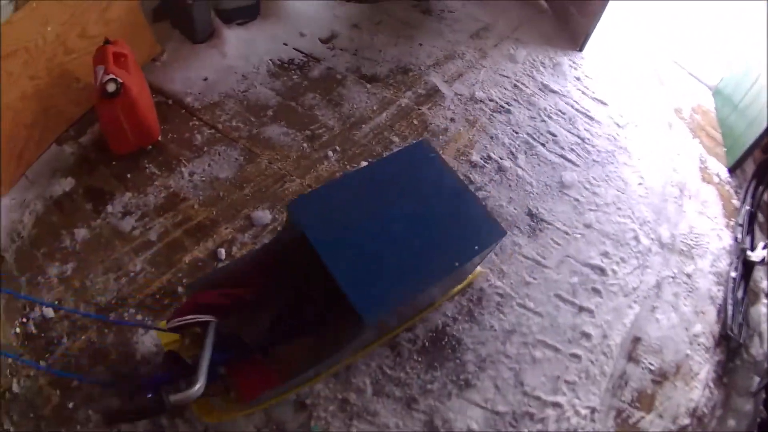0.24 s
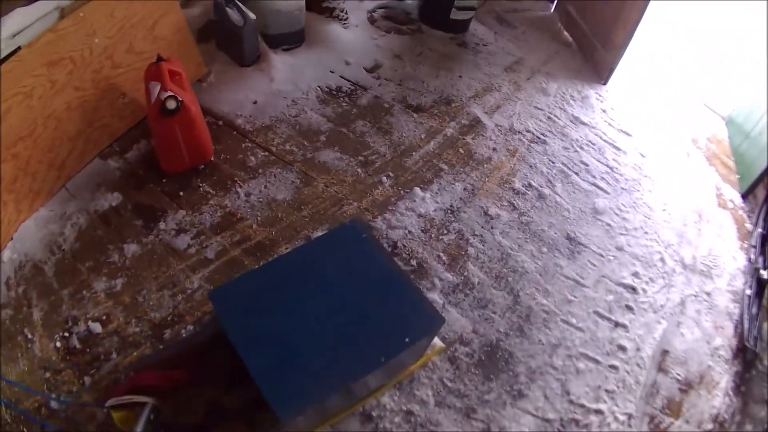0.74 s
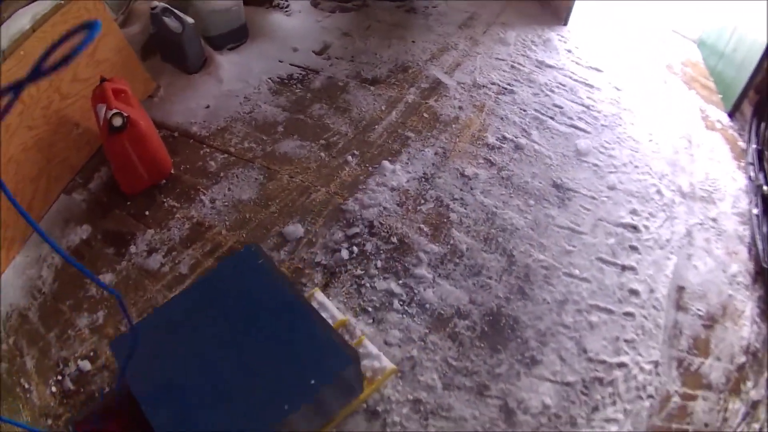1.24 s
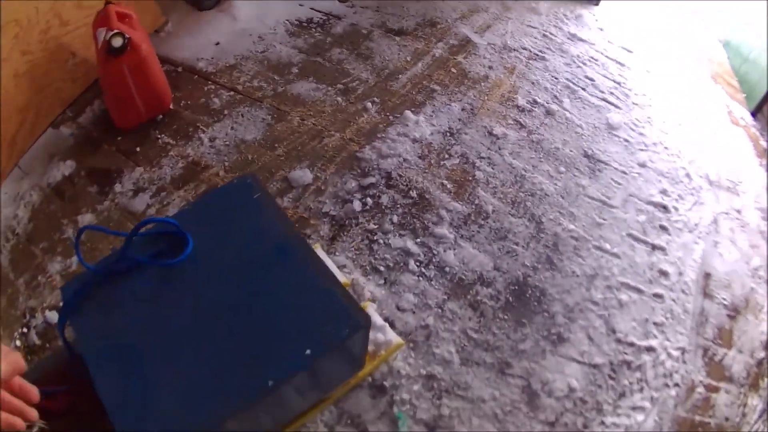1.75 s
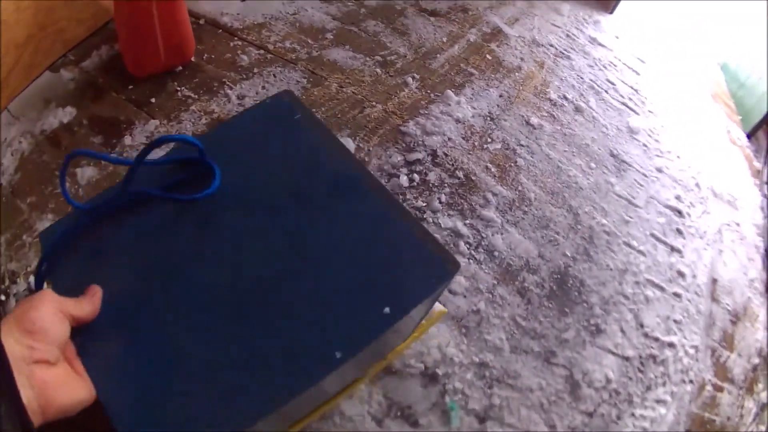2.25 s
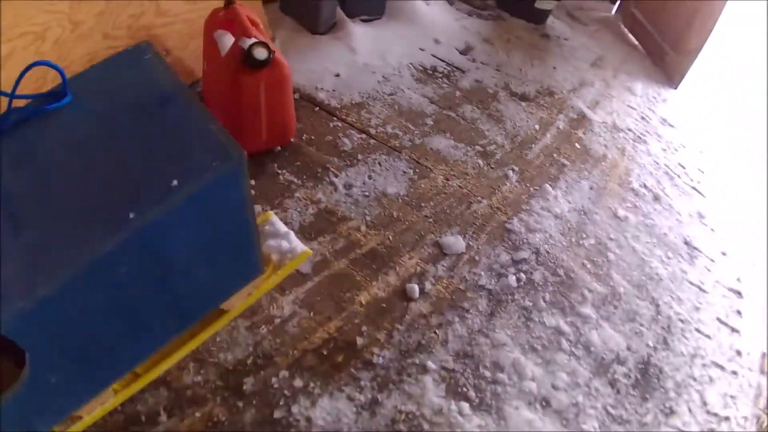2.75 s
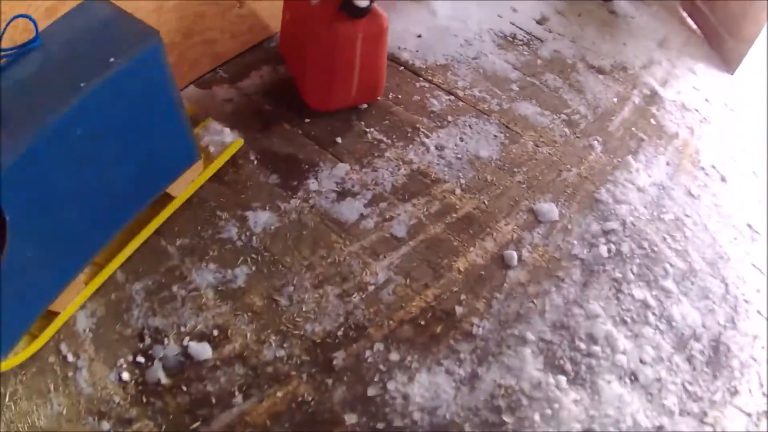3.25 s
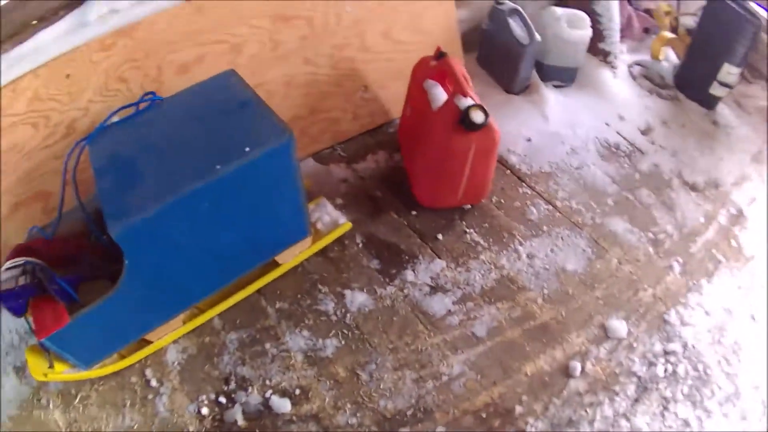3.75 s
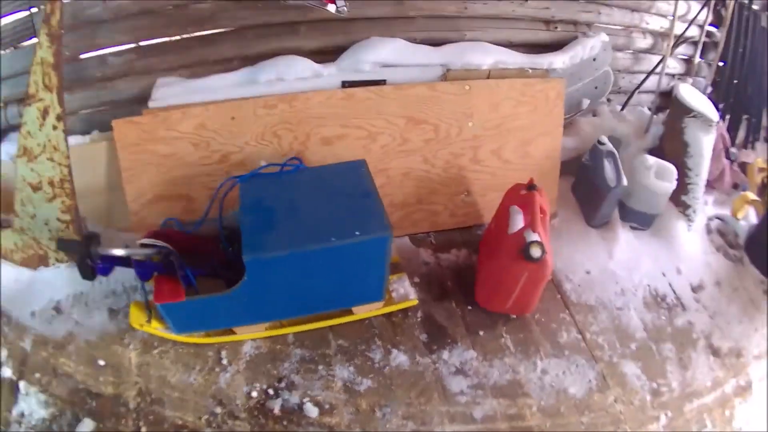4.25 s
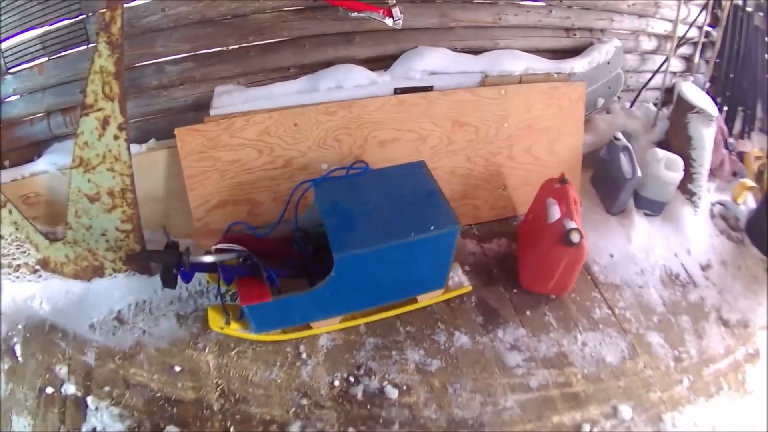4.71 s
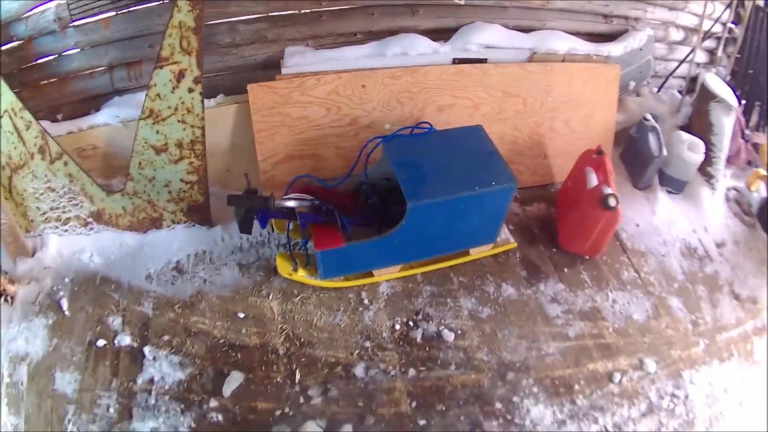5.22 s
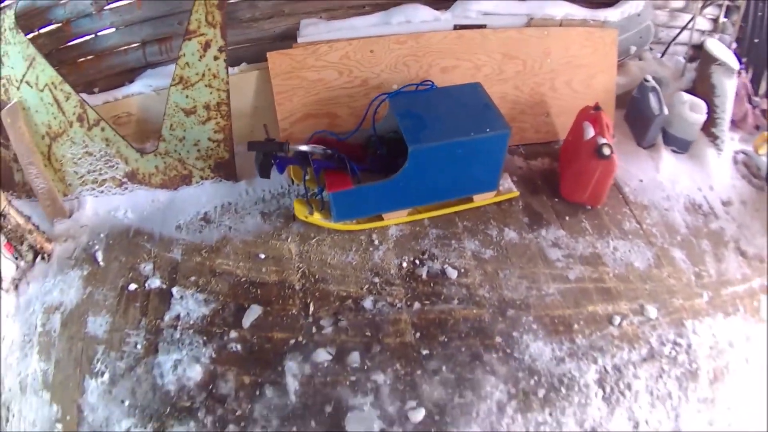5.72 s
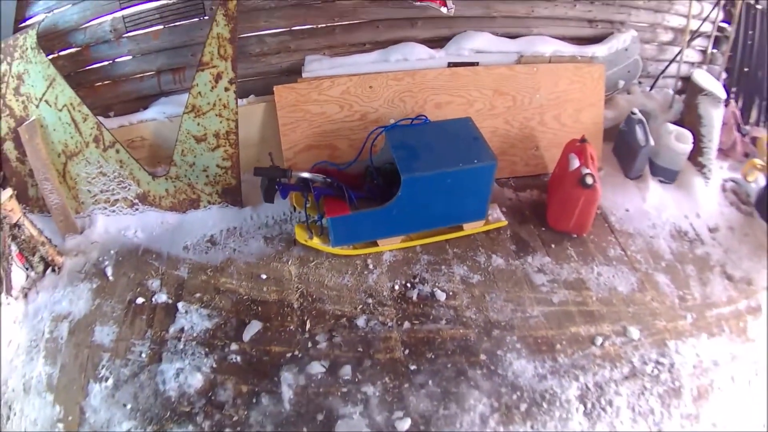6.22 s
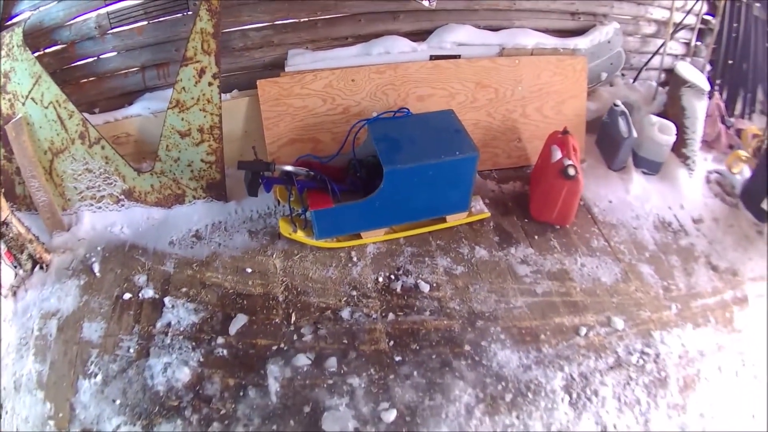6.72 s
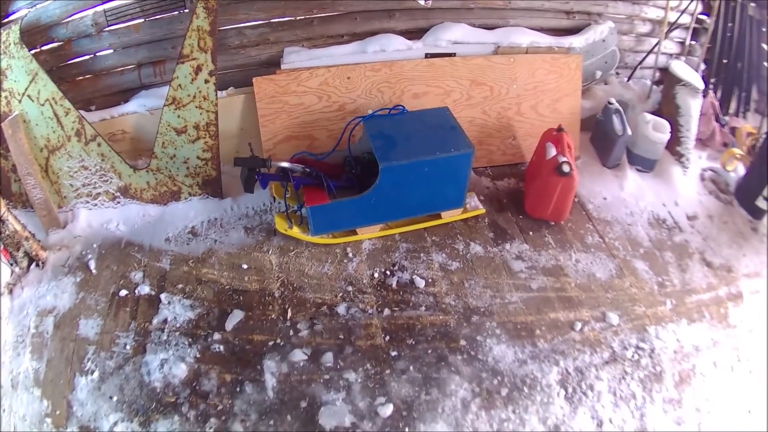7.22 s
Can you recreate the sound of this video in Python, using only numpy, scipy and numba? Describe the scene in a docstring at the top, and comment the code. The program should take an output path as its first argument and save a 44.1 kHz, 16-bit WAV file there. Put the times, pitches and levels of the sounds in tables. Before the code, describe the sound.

A hollow wooden box sled scrapes and bangs loudly over icy planks, then boots crunch softly in snow and fingers tap a camera case.

```python
"""Hollow scrapes and knocks come first: a plywood box sled is dragged and shoved over a snowy plank floor
in an open shed, close to a small camera. Stick-slip pulses drive the modes of the box, and ice grains crackle.
Then filtered pulses make boots and clothes rustle, and fingers rub and tap the camera case as decaying sines.
Faint air and a thin whine lie beneath. Hard shoves clip the input and a limiter pulls the level down."""
import sys
import numpy as np
from scipy import signal
from scipy.fft import rfft, irfft
from scipy.io import wavfile
from scipy.ndimage import uniform_filter1d
from numba import njit

SR = 44100
rng = np.random.default_rng(int(sys.argv[2]) if len(sys.argv) > 2 else 0)


def transcribe(u):
    """Save the signal u as a 16-bit wav file named by the first command-line argument.

    u: samples, shape (n,) or (channels, n), limited to [-1, 1]; the rate is SR.
    q: integer samples, one column per channel.
    """
    v = np.clip(np.atleast_2d(u).T, -1, 1)
    q = np.round(v * 32767).astype(np.int16)
    wavfile.write(sys.argv[1], SR, q)


N = 329427
T = np.arange(N) / SR
HIT_T = T[:SR // 4]  # time since a blow, s


def undb(db):
    """Decibels to amplitude gain."""
    return 10 ** (np.asarray(db) / 20)


def unit(x):
    """Scale to an rms of 1."""
    return x / np.sqrt(np.mean(x ** 2))


def unit_energy(response):
    """Scale an impulse response so that its squares sum to 1."""
    return response / np.sqrt(np.sum(response ** 2))


def decay(t, t60_s):
    """Exponential fade that loses 60 dB in t60_s."""
    return 1000 ** (-t / t60_s)


def add(out, start_s, x):
    """Mix x into out from start_s on."""
    i = int(start_s * SR)
    out[i:i + len(x)] += x[:N - i]


def colour(x, points, size=4096):
    """Causal filter through (Hz, dB) points, from the cepstrum of the log gain."""
    hz, db = np.transpose(points)
    bin_hz = np.arange(1, size // 2 + 2) * SR / size
    log_gain = np.interp(np.log(bin_hz), np.log(hz), db) * np.log(10) / 20
    cepstrum = irfft(log_gain)
    cepstrum[1:size // 2] *= 2  # fold onto positive times: minimum phase
    cepstrum[size // 2 + 1:] = 0
    return signal.fftconvolve(x, irfft(np.exp(rfft(cepstrum))))[:N]


def band(x, hz, width_hz):
    """Resonant peak of unit gain."""
    return signal.lfilter(*signal.iirpeak(hz, hz / width_hz, SR), x)


def bandpass(x, order, low_hz, high_hz):
    """Butterworth band-pass."""
    sos = signal.butter(order, (low_hz, high_hz), "bandpass", fs=SR, output="sos")
    return signal.sosfilt(sos, x)


def walk(rate_hz):
    """Random level that glides to a new value rate_hz times a second; spread near 1."""
    hold = int(SR / rate_hz)
    steps = np.repeat(rng.standard_normal(N // hold + 1), hold)
    return 1.5 * uniform_filter1d(steps, hold)[:N]


def slips(rate_hz, spread_db, patchy_db, patch_rate_hz):
    """Stick-slip pulses at random moments, a few much larger, coming in patches."""
    fired = rng.random(N) < rate_hz / SR
    size = undb(spread_db * rng.exponential(size=N)) * rng.standard_normal(N)
    return unit(fired * size * undb(patchy_db * walk(patch_rate_hz)))


def wavering(hz, width_hz, depth):
    """A tone whose strength and phase wander at about width_hz."""
    in_phase, quadrature = depth * walk(width_hz), depth * walk(width_hz)
    phase = 2 * np.pi * np.cumsum(hz + 0 * T) / SR
    return unit((1 + in_phase) * np.sin(phase) + quadrature * np.cos(phase))


def curves(table):
    """Columns over time; the first, a level, is at -120 dB outside the table."""
    s, db, *rest = np.transpose(table)
    return [np.interp(T, s, db, -120, -120)] + [np.interp(T, s, column) for column in rest]


def swells(table, rise_db_s, fall_db_s):
    """Each row rises, holds from start to end and falls; the loudest leads. Level, and second column over level."""
    start, end, level_db, over_db = np.transpose(table)[:, :, None]
    before, after = np.maximum(start - T, 0), np.maximum(T - end, 0)
    each = level_db - rise_db_s * before - fall_db_s * after
    db = each.max(axis=0)
    return db, (each + over_db).max(axis=0) - db


def louder(db, over_db, bed_db, bed_over_db):
    """The louder of a swell and the bed it stands on, in both columns."""
    top_db = np.maximum(db, bed_db)
    return top_db, np.maximum(db + over_db, bed_db + bed_over_db) - top_db


def ring(modes, strike_db):
    """One response per blow: decaying sines, each mode struck with its own strength; peak 1."""
    t = HIT_T
    chance = rng.standard_normal(strike_db.shape + (2,))  # strength and pitch vary from blow to blow
    out = 0
    for k, (hz, db, t60_s) in enumerate(modes):
        gain = undb(db + strike_db[:, k, None] + 2.0 * chance[:, k, :1])
        pitch_hz = hz * (1 + 0.028 * chance[:, k, 1:])
        out = out + gain * np.sin(2 * np.pi * pitch_hz * t) * decay(t, t60_s)
    out *= 1 - np.exp(-t / 0.00025)  # the contact builds up
    return out / np.abs(out).max(axis=1, keepdims=True)


def rumble(db):
    """Low shudder of the floor: noise from 45 to 110 Hz with an unsteady level."""
    low = bandpass(rng.standard_normal(N), 2, 45, 110)
    return undb(db + 3.4 * walk(15)) * unit(low)


# runners sliding over the planks, hauled, nudged or turned: start_s, end_s, box_level_db, grit_over_box_db
SLIDES = [(0, .35, -10.5, -23), (.375, .64, -13.5, -21), (.42, .49, -14, -14.5), (.645, .74, -14, -21),
          (.86, .99, -23, -24.5), (1.02, 1.06, -19.5, -19.5), (1.065, 1.09, -16.5, -21.5),
          (1.12, 1.19, -26.5, -20), (1.46, 1.8, -37.5, -13), (1.85, 1.91, -23.5, -18),
          (1.93, 2.04, -23, -21.5), (2.1, 2.36, -37.5, -14.5), (2.93, 3.16, -15.5, -27),
          (3.205, 3.25, -17.5, -24)]


def slide_levels():
    """Box level and grit over it: the slides stand on a faint creak while the box is held."""
    settle_db, settle_grit_db, settle_end_s = -42.5, -19, 3.9
    rise_db_s, fall_db_s = 802, 241.5
    bed_db = settle_db - fall_db_s * np.maximum(T - settle_end_s, 0)
    return louder(*swells(SLIDES, rise_db_s, fall_db_s), bed_db, settle_grit_db)


# crushed ice spectrum: frequency_hz, relative_density_db (per Hz)
GRIT = [(1000, -21.5), (1800, -0.5), (3200, -1.5), (5500, -8.5), (8000, -16), (12000, -27), (15500, -31)]


def ice(grit):
    """Ice grains crackle under the runners: pulses through a bright, broad filter."""
    click = signal.unit_impulse(len(HIT_T))
    return signal.oaconvolve(grit, unit_energy(colour(click, GRIT)))[:N]


# modes of the hollow box: frequency_hz, width_hz, relative_level_db
BOX = [(170.2, 28.2, 3.5), (251, 63, 2.5), (400, 64, -3.5), (622.5, 93, 0), (806, 105, -4),
       (1020, 171, -4.5), (1228, 260, -5.5)]
# panels between the modes: frequency_hz, relative_density_db (per Hz)
BOX_SKIN = [(60, -49.5), (150, -3), (400, 0), (1100, -5), (2400, -17), (3200, -36.5), (8000, -85.5)]


def box(push):
    """The push sounds the air and panels of the box: resonant modes and a broad skin between them."""
    click = signal.unit_impulse(len(HIT_T))
    soft = signal.lfilter(*signal.butter(2, 3000, fs=SR), click)  # a slip is a short push, not a spike
    modes = [(-1) ** k * undb(db) * band(soft, hz, width) for k, (hz, width, db) in enumerate(BOX)]
    out = 0
    for mode in modes:
        # the contact wanders along the runner, so each mode gets its own changing share of the push
        share = push * undb(1.8 * walk(25))
        out = out + signal.oaconvolve(share, mode)[:N]
    out /= np.sqrt(np.sum(sum(modes) ** 2))
    skin = unit_energy(colour(click, BOX_SKIN))
    return out + undb(-5) * signal.oaconvolve(push, skin)[:N]


# box bumping on planks or slapped: start_s, level_db, crack_over_level_db, panel_start_pitch_hz
BUMPS = [(0.19, -8.5, -14, 600), (0.219, 5.5, -26.5, 453), (0.303, 9.5, -40, 425), (0.417, 4.5, -21.5, 420),
         (0.513, 4.5, -27.5, 1100), (0.611, -0.5, -46, 215), (0.649, 3.5, -30.5, 280),
         (0.682, 1, -23.5, 427), (0.861, -10.5, -31, 400), (1.072, 1.5, -29, 594), (1.233, -5, -26, 1020),
         (1.246, 5, -28.5, 493), (1.571, -10, -20.5, 296), (1.836, -13, -20.5, 616),
         (1.854, -8.5, -31, 269), (1.921, -1, -28.5, 330), (1.988, 0.5, -21.5, 582),
         (2.006, -13, -13.5, 500), (2.018, -3, -33, 198), (2.663, -34, -1.5, 323), (2.785, -2.5, -24, 256),
         (2.793, 2.5, -17.5, 705), (2.83, -6.5, -28.5, 300), (2.901, -19.5, -36, 400),
         (2.925, 9.5, -30.5, 750), (2.955, -4, -8, 500), (3.017, 0, -9.5, 1535), (3.044, -6.5, -11, 1270),
         (3.206, -4, -18, 830), (3.229, -3, -24, 906)]


def bumps(push, grit):
    """Blows add chatter to the push and cracks to the grit; returns the struck panel and a contact tick."""
    blows = np.zeros(N)
    t = HIT_T
    noise = rng.standard_normal((len(BUMPS), 3, len(t)))
    for (start, level_db, crack_over_db, hz), (thud, crack, tick) in zip(BUMPS, noise):
        crack_db = level_db + crack_over_db
        fade = undb(level_db) * decay(t, 0.064)
        add(push, start, undb(-4.5) * fade * thud)
        add(grit, start, undb(crack_db) * crack * decay(t, 0.085))
        tone = np.sin(2 * np.pi * hz * t * (1 + 6.12 * t))  # pitch rises: the panel tightens as it is pressed
        panel = undb(-3) * fade * decay(t, 0.13) * (1 - np.exp(-t / 0.0018)) * tone
        sharp = np.diff(tick, prepend=0) * decay(t, 0.012)
        add(blows, start, panel + undb(crack_db - 13.5) * sharp)
    return blows


# hard shoves that press the runners down: start_s, end_s, extra_force_db
SHOVES = [(0.42, 0.516, 9.5), (0.521, 0.562, 6), (2.927, 3.071, 13)]


def shove_force_db():
    """Extra force over time: a 2 ms rise, a hold and a 57 ms release for each shove."""
    force_db = 0
    for start, end, extra_db in SHOVES:
        force_db = force_db + extra_db * np.interp(T, (start - .002, start, end, end + 0.057), (0, 1, 1, 0))
    return force_db


# a runner squeaking as the sled turns, a curve through: time_s, level_db, pitch_hz
SQUEAK = [(2.15, -46, 794), (2.2, -37, 680), (2.27, -40.5, 602), (2.31, -36.5, 723), (2.35, -38, 993),
          (2.375, -53, 980)]


def squeak():
    """Runner squeak: a gliding tone and its octave, while a box panel hums along."""
    db, hz = curves(SQUEAK)
    tone = wavering(hz, 43, 0.21) + undb(-14.0) * wavering(2 * hz, 130, .8)
    hum = wavering(BOX[1][0], 65, .9)
    return undb(db) * (tone + hum)


def sled():
    """Slips and bumps drive the box and the ice; shoves press both harder."""
    db, grit_over_db = slide_levels()
    force_db = shove_force_db()
    lurch = walk(60)  # the runners catch and let go, in box and ice alike
    push = undb(db + force_db + 1.3 * lurch) * slips(1500, 1.12, 0.99, 150)
    grit = undb(db + grit_over_db + 0.8 * force_db + 0.23 * lurch) * slips(5000, 1.7, 1.2, 90)
    blows = bumps(push, grit)  # also adds to push and grit
    return box(push) + blows + ice(grit) + rumble(db - 18.5 + force_db) + squeak()


# outdoor air spectrum: frequency_hz, relative_density_db (per Hz)
AIR = [(15, 9), (100, -6), (630, -18), (3100, -25.5), (9300, -32.5), (16400, -33)]


def air():
    """Still outdoor air as gently wavering filtered noise, and the thin whine of camera electronics."""
    hush = undb(-48.5 + walk(32)) * unit(colour(rng.standard_normal(N), AIR))
    whine = undb(-66) * wavering(10050, 200, .4)
    return hush + whine


# boots shuffling in snow and coming to rest, a curve through: time_s, level_db, cloth_over_level_db
SHUFFLE = [(3.45, -53, -21), (3.66, -36.5, -12.5), (3.9, -44.5, -15), (4.3, -40.5, -9.5),
           (4.6, -36.5, -16.5), (4.93, -44, -13), (5.62, -38, -11), (5.78, -53.5, -40), (6.1, -52.5, -18.5),
           (7.17, -64.5, -9.5)]
# footfalls: start_s, end_s, level_db, cloth_over_level_db
FOOTFALLS = [(3.755, 3.78, -29.5, -15.5), (4.01, 4.05, -39, -10), (4.36, 4.42, -36, -9.5),
             (4.45, 4.53, -30, -12), (5.35, 5.38, -31, -16), (5.805, 5.82, -39.5, -17),
             (6.33, 6.38, -42, -4)]
# snow crunch spectrum: frequency_hz, relative_density_db (per Hz)
BOOTS = [(50, -27), (160, -3.5), (1000, -5), (1800, -12.5), (3500, -31), (7000, -70)]
# cloth hiss spectrum: frequency_hz, relative_density_db (per Hz)
CLOTH = [(1000, -21.5), (1800, -13.5), (5500, -16.5), (9000, -26.5), (13000, -29.5), (15300, -31)]
# a heel landing on a loose plank: start_s, level_db
HEEL = [(4.424, -16), (4.4487, -16.5)]
# modes of that plank: frequency_hz, relative_level_db, t60_s
PLANK = [(79, 0, .15), (125, -7, .1)]


def walker():
    """Snow crunches under boots and sleeves hiss as filtered pulses; a heel rings a plank."""
    footfalls = swells(FOOTFALLS, rise_db_s=210, fall_db_s=114.5)
    db, cloth_over_db = louder(*footfalls, *curves(SHUFFLE))
    out = undb(db) * unit(colour(slips(3000, 1.5, 1.5, 70), BOOTS))
    out += undb(db + cloth_over_db) * unit(colour(slips(12000, 1.5, 1.2, 40), CLOTH))
    thumps = ring(PLANK, np.zeros((len(HEEL), len(PLANK))))
    for (start, level_db), thump in zip(HEEL, thumps):
        add(out, start, undb(level_db) * thump)
    return out + rumble(db - 12.5)


# modes of the camera case: frequency_hz, relative_level_db, t60_s
CASE = [(117.6, -21.5, 0.068), (269, -7.5, 0.041), (692, -8.5, 0.04), (991, 10, 0.032), (1239, 7.5, 0.033),
        (1810, -12, 0.0245), (2210, 2, 0.011), (2988, -3, 0.013), (3472, -5.5, 0.02), (4320, -10.5, 0.0075),
        (5420, -16.5, 0.011), (6200, -14, 0.0089), (8250, -13.5, 0.0062), (10600, -21, 0.004)]
LID, SIDE = 3, 4  # rows of CASE where the lid and the side wall ring most
# taps and button clicks on the case: start_s, level_db, hardness_db_per_octave, place (0 lid to 1 side)
TAPS = [(3.64, -18.5, -6, 0.17), (3.691, -18.5, 0, 0.6), (3.753, -17.5, -2, 0.1), (4.446, -23.5, 9.5, 0.95),
        (4.501, -19, 4, 0.89), (4.509, -19, 5, 0.98), (4.644, -12, -2.5, 0.9), (4.669, -13.5, -1, 0.71),
        (4.973, -3.5, -7, 0.025), (4.996, -17, -5.5, 0.41), (5.531, -9, 4, 0.64), (5.5584, -7, 4, 0.94),
        (5.5631, 2, 7.5, 0.88), (5.569, -6, 5.5, 1), (5.801, -23, -5, 0.5), (6.024, -19.5, -6.5, 0.11),
        (6.355, -26, -1.5, 0.18), (6.465, -23.5, -3, 0.33), (7.1818, 11, 4, 0.22)]


def taps():
    """Each contact rings the case; its hardness tilts the modes and its place favours lid or side."""
    start, level_db, hardness, place = np.transpose(TAPS)
    octaves = np.log2(np.array(CASE)[:, 0] / 1000)
    strike_db = np.outer(hardness, octaves)  # hard contacts reach the high modes
    strike_db[:, LID] -= 20 * place
    strike_db[:, SIDE] -= 20 * (1 - place)
    loose = bandpass(rng.standard_normal((len(TAPS), len(HIT_T))), 3, 1300, 4500)
    loose *= undb(1.8 * hardness[:, None] - 8.5) * decay(HIT_T, 0.014)  # loose parts chatter, most after hard taps
    out = np.zeros(N)
    for s, gain, tap in zip(start, undb(level_db), ring(CASE, strike_db) + loose):
        add(out, s, gain * tap)
    return out


# fingers rubbing the case: start_s, end_s, level_db, hiss_over_level_db
RUBS = [(6.225, 6.25, -40, -4.5), (6.35, 6.36, -27.5, -24), (6.38, 6.43, -34.5, -5), (6.46, 6.51, -37, -17),
        (6.54, 6.585, -42, -15), (6.64, 6.68, -44.5, -14)]


def rubs():
    """Skin slips sound the lid mode, and the higher case modes as hiss."""
    db, hiss_over_db = swells(RUBS, rise_db_s=314, fall_db_s=264)
    skin = slips(12000, 1.4, 2.5, 60)
    hiss = 0
    for hz, mode_db, t60_s in CASE[SIDE + 3:]:
        width_hz = 17.0 / t60_s
        hiss = hiss + undb(mode_db) * band(band(skin, hz, width_hz), hz, width_hz)
    lid = unit(band(skin, CASE[LID][0], 120.0))
    return undb(db) * lid + undb(db + hiss_over_db) * unit(hiss)


# the thumb jolting the whole camera as it presses stop: start_s, level_db, pitch_hz, t60_s
PRESS = (7.1805, -9, 95, .04)


def press():
    """The jolt is one low decaying sine."""
    start, level_db, hz, t60_s = PRESS
    out = np.zeros(N)
    add(out, start, undb(level_db) * np.sin(2 * np.pi * hz * HIT_T) * decay(HIT_T, t60_s))
    return out


def shed(near):
    """Wall reflections: a decaying noise response, dulled above 2 kHz, that starts after 6 ms."""
    t = T[:SR // 2]
    noise = signal.lfilter(*signal.butter(1, 2000, fs=SR), rng.standard_normal(len(t)))
    walls = noise * decay(t, .2) * (t > .006)
    return undb(-14) * signal.fftconvolve(near, unit_energy(walls))[:N]


def scene():
    """Sled and walker sound in the shed; the fingers and air reach the microphone directly."""
    near = sled() + walker()
    fingers = taps() + rubs() + press()
    return (near + shed(near) + fingers + air())[None]


@njit
def limiter(x, top, floor, attack, release):
    """Gain falls quickly when the level passes top and comes back slowly."""
    gain, level = np.empty(len(x)), 0.
    for i in range(len(x)):
        level += (abs(x[i]) - level) * (attack if abs(x[i]) > level else release)
        gain[i] = max(floor, min(1., top / (level + 1e-9)))
    return gain


def record(dry):
    """The input clips, a limiter steered by the raw signal follows, the camera goes off, the top is cut."""
    attack_s, release_s, look_ahead_s = 0.0077, .06, 0.0034
    off_s, off_fade_s, top_hz = 7.216, 0.0025, 16500
    gain = limiter(dry[0], 0.44, 0.46, 1 / (attack_s * SR), 1 / (release_s * SR))
    x = np.clip(dry[0], -1.0, 1.0) * np.roll(gain, -int(look_ahead_s * SR))
    x = x * np.clip((off_s - T) / off_fade_s, 0, 1)
    x = signal.lfilter(*signal.butter(1, 25., "highpass", fs=SR), x)
    return signal.sosfilt(signal.ellip(10, .2, 80, top_hz, fs=SR, output="sos"), x)[None]


dry = scene()
out = record(dry)
transcribe(out)
```